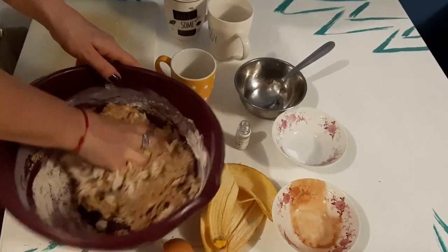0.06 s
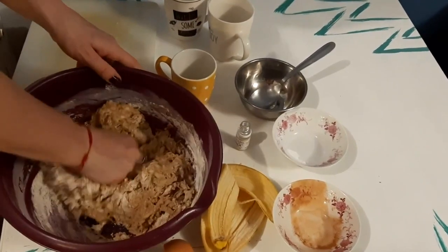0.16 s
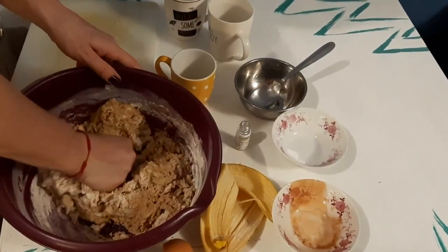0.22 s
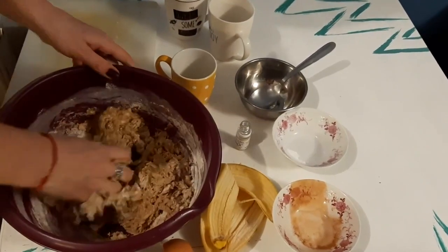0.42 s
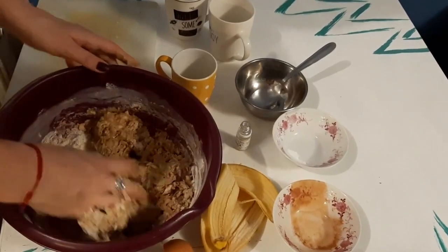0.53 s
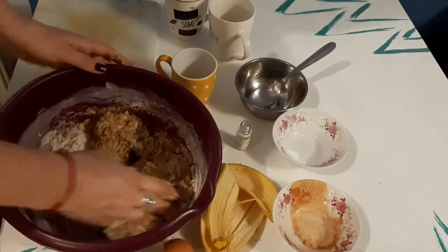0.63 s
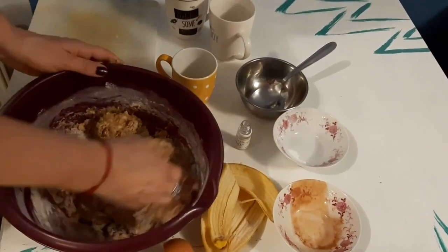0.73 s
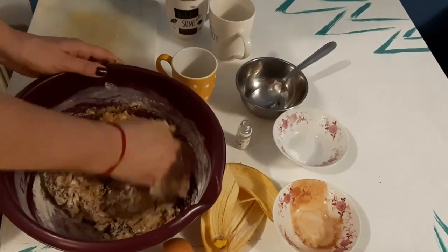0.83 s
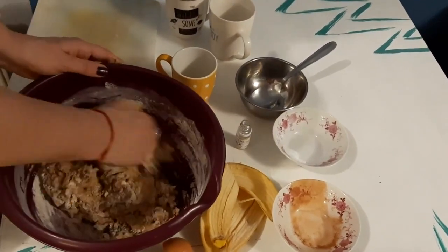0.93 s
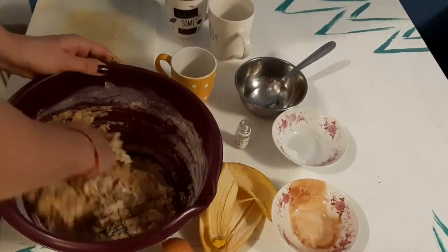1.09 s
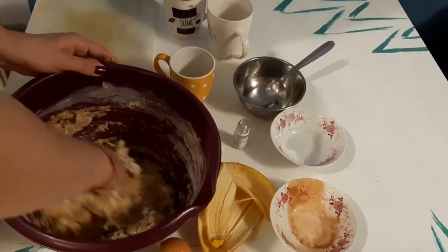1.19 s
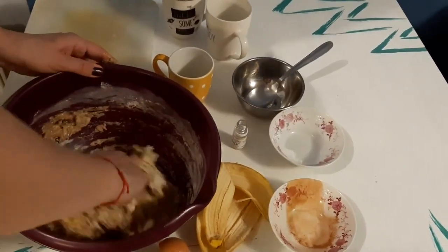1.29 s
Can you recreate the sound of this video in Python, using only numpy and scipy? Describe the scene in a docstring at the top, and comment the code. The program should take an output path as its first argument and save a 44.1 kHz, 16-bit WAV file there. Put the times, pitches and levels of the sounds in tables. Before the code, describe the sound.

Soft, sticky dough squishes throughout as a hand kneads it in a plastic bowl, close and slightly right, with fine wet crackle, small air pops and a dull rumble under each push. At about 0.2 seconds the bowl knocks sharply on the table and skids briefly. Pops cluster around 0.5 seconds, and a rubbing swell comes near 1.15 seconds as the dough is dragged round. The small kitchen is quiet.

```python
"""Soft, sticky dough kneaded by hand in a plastic bowl, close to a stereo pair on a kitchen table.
Slightly right of centre, the dough squishes with a fine wet crackle and air pockets pop in it,
while the bowl rumbles under the pushes. Once the bowl tips, knocks on the table and skids a little.
Behind it the small room answers, over quiet room tone."""
import sys
import numpy as np
from scipy import signal
from scipy.fft import rfft, irfft
from scipy.io import wavfile

SR = 44100
rng = np.random.default_rng(int(sys.argv[2]) if len(sys.argv) > 2 else 0)


def materialize(psi):
    """Save the field psi as 16-bit PCM at rate SR to the path in sys.argv[1].

    A 1-D psi becomes a single channel; in a 2-D psi each row is a channel.
    """
    bounded = np.clip(np.atleast_2d(psi).T, -1, 1)
    quanta = np.round(bounded * 32767).astype(np.int16)
    wavfile.write(sys.argv[1], SR, quanta)


N = 59535
T = np.arange(N) / SR
BIN_HZ = np.arange(N // 2 + 1) * SR / N


def from_db(db):
    """Decibels to gain."""
    return 10 ** (np.asarray(db) / 20)


def unit_rms(x):
    """Scale to unit power."""
    return x / np.sqrt(np.mean(x ** 2) + 1e-20)


def at_hz(points, hz):
    """Read a table on a log-frequency axis."""
    f, value = np.transpose(points)
    return np.interp(np.log(hz + 1e-3), np.log(f), value)


def pan(db):
    """Gains at the two microphones; positive dB is to the left."""
    return from_db(np.array([[.5], [-.5]]) * db)


def butter(x, order, hz, kind="low"):
    """Butterworth filter."""
    return signal.sosfilt(signal.butter(order, hz, kind, fs=SR, output="sos"), x + 1e-18)


def band(x, hz, width_hz):
    """A band-pass with fairly steep skirts."""
    low = np.sqrt(hz ** 2 + width_hz ** 2 / 4) - width_hz / 2
    return butter(x, 2, [low, min(low + width_hz, .45 * SR)], "band")


def colour(x, spectrum):
    """Give a signal a spectrum; unit power."""
    return unit_rms(irfft(rfft(x) * from_db(at_hz(spectrum, BIN_HZ)), N))


def burst(s, decay_s):
    """Sudden start, exponential decay."""
    return (T >= s) * np.exp(-np.abs(T - s) / decay_s)


def swell(s, rise_s, fall_s):
    """Exponential rise to a peak and fall from it."""
    return np.exp(-np.abs(T - s) / np.where(T < s, rise_s, fall_s))


# likeness of diffuse sound at the two microphones: f/Hz, correlation
MIC_LIKENESS = [(100, 0.93), (260, 0.96), (520, 0.76), (1100, 0.053), (3000, 0.023), (12000, 0.02)]
def noise(spectrum):
    """Coloured stereo noise, alike at both microphones in the bass only."""
    mid, side = rfft(rng.standard_normal((2, N)))
    alike = at_hz(MIC_LIKENESS, BIN_HZ)
    pair = np.sqrt(1 + alike) * mid + np.sqrt(1 - alike) * side * [[1], [-1]]
    return unit_rms(irfft(pair * from_db(at_hz(spectrum, BIN_HZ)), N))


# spectrum of the quiet kitchen: f/Hz, relative level/dB
ROOM_TONE_SPECTRUM = [(25, -27), (60, 1), (140, 9.5), (400, 11), (1000, -45), (2200, -19), (15000, -27)]
def room_tone():
    """A faint, low, steady noise all round the microphones."""
    return from_db(-65.5) * noise(ROOM_TONE_SPECTRUM)


# reverberation of the kitchen: f/Hz, T60/s
ROOM_DECAY = [(120, 0.76), (700, 0.43), (2000, 0.33), (5000, 0.34), (13000, 0.25)]
def kitchen_echo(delay_s=0.0019):
    """The walls' answer: bands of noise, each dying at its own rate; unit energy."""
    white, echo = noise([(20, 0), (20000, 0)]), 0
    edges_hz = np.geomspace(60, 18000, 9)
    for low, high in zip(edges_hz, edges_hz[1:]):
        t60 = at_hz(ROOM_DECAY, np.sqrt(low * high))
        echo = echo + butter(white, 2, [low, high], "band") * from_db(-60 * T / t60)
    return unit_rms(echo * (T > delay_s)) / np.sqrt(N)


def in_room(x, echo, wet_db):
    """Direct sound at the microphones plus its echo."""
    x = x * np.ones((2, 1))
    return x + from_db(wet_db) * signal.fftconvolve(x, echo, axes=1)[:, :N]


# soft shoves on the table: t/s, level/dB
TABLE_SHOVES = [(0.17, -51), (0.355, -51), (.645, -60), (1.084, -52.5)]
def table_sway(hz=91.8, rise_s=0.04):
    """Each shove rocks the table: a low tone swells and fades."""
    sway = 0
    for s, db in TABLE_SHOVES:
        age = np.maximum(T - s, 0)
        envelope = (age / rise_s * np.exp(1 - age / rise_s)) ** 2
        sway = sway + from_db(db) * envelope * np.sin(2 * np.pi * hz * age)
    return sway


# modes of bowl and table: f/Hz, relative level/dB, T60/s
BOWL_TABLE_MODES = [(133.9, 5.5, 0.29), (158.7, 3, 0.2), (183, -0.5, 0.092), (230.2, 4, 0.22),
                    (303, 6.5, 0.2), (343.2, 3.5, 0.26), (442, -9.5, 0.45), (488.5, -6.5, 0.39),
                    (566.2, -12.5, 0.27), (612, 0, 0.13), (812, -9, 0.063)]
def bowl_rings(force):
    """The bowl and table answer a force with a decaying sine for each mode."""
    ringing = 0
    for hz, db, t60 in BOWL_TABLE_MODES:
        radius, angle = from_db(-60 / (t60 * SR)), 2 * np.pi * hz / SR
        feedback = [1, -2 * radius * np.cos(angle), radius ** 2]
        ringing = ringing + from_db(db) * signal.lfilter([0, np.sin(angle)], feedback, force + 1e-18)
    return ringing


# the hand presses the dough against the bowl: t/s, level/dB, rise/s, fall/s
HAND_PUSHES = [(0.071, -54.5, 0.013, 0.027), (0.177, -47, 0.0034, 0.0088), (0.456, -46.5, 0.0048, 0.031),
               (0.54, -54, 0.0054, 0.068), (0.665, -48.5, 0.0066, 0.047), (0.828, -47.5, 0.013, 0.028),
               (1.0, -52.5, 0.02, 0.014), (1.197, -54, 0.0058, 0.019)]
# spectrum of the bowl's rumble: f/Hz, relative level/dB
RUMBLE_SPECTRUM = [(40, -29), (90, -12.5), (140, 3.5), (220, 1), (350, -4.5), (600, -7), (1000, -18),
                   (2500, -54)]
def bowl_rumble(drag_db=-29.5, drag_follows=0.62, ring_db=-6):
    """Dull rumble and faint ring of the bowl under each push and the dragged dough."""
    squeeze_db, _ = squeeze()
    drag = from_db(drag_db + drag_follows * squeeze_db)
    push_power = sum((from_db(db) * swell(s, rise, fall)) ** 2 for s, db, rise, fall in HAND_PUSHES)
    effort = np.sqrt(drag ** 2 + push_power)
    rumble = effort * noise(RUMBLE_SPECTRUM)
    ringing = unit_rms(bowl_rings(effort * rng.standard_normal(N)))
    return rumble + from_db(ring_db) * np.std(rumble) * ringing


# hiss of plastic sliding on the table: f/Hz, relative level/dB
SKID_SPECTRUM = [(300, -18), (1200, -8), (2300, 10.5), (3200, -7), (5000, 6), (9000, -5.5), (12000, -2.5),
                 (15000, -14)]
# squeaks in the slide: f/Hz, width/Hz, level/dB
SKID_SQUEAKS = [(2280, 92, -32), (8210, 140, -34.5), (11670, 790, -34.5)]
def bowl_skid(echo):
    """The bowl slides briefly after landing: a hiss with thin squeaks in it."""
    rub = from_db(-29) * noise(SKID_SPECTRUM)
    for hz, width_hz, db in SKID_SQUEAKS:
        rub = rub + from_db(db) * unit_rms(band(rng.standard_normal((2, N)), hz, width_hz))
    return in_room(rub * swell(0.2464, rise_s=0.0045, fall_s=0.0083), echo, wet_db=-10)


# the bowl lands and rocks: t/s, thump level/dB, crack level/dB
BOWL_CONTACTS = [(0.2256, -27.5, -18.5), (0.233, -26, -28.5), (.2470, -31, -35.5)]
# the bowl's higher modes, too close to tell apart: f/Hz, relative level/dB
BODY_SPECTRUM = [(30, -42), (70, -46), (110, -25), (250, 6.5), (420, 4), (640, 4.5), (880, -0.5),
                 (1100, -4.5), (1600, -15), (3500, -24)]
# crack of the plastic: f/Hz, relative level/dB
CRACK_SPECTRUM = [(40, -27), (110, -8), (650, 9.5), (1150, -2.5), (2200, -2), (3000, -6), (4600, -2),
                  (6000, -15.5), (9000, -16), (15000, -46)]
def bowl_knock(echo, contact_hz=1070, low_cut_hz=151.5, body_t60_s=0.31):
    """Each contact rings the bowl and table and gives a short plastic crack."""
    blows, cracks = np.zeros(N), 0
    for s, thump_db, crack_db in BOWL_CONTACTS:
        blows[int(s * SR)] -= from_db(thump_db)
        cracks = cracks + from_db(crack_db) * burst(s, decay_s=0.0066)
    force = butter(butter(blows, 1, contact_hz), 4, low_cut_hz, "high")
    thump = in_room(bowl_rings(force), echo, wet_db=-14.5)
    landing_s = BOWL_CONTACTS[0][0]
    body = from_db(-24) * burst(landing_s, body_t60_s / np.log(1000)) * noise(BODY_SPECTRUM)
    return thump + body + in_room(cracks * noise(CRACK_SPECTRUM), echo, wet_db=-1.5)


# where the bowl sits between the microphones: f/Hz, left minus right/dB
BOWL_POSITION = [(150, -2.5), (600, -3.5), (1300, -1.3), (4500, -3.5), (11000, -0.5)]
def place_bowl(bowl):
    """The bowl is a little louder on the right, by an amount that varies with frequency."""
    return irfft(rfft(bowl) * pan(at_hz(BOWL_POSITION, BIN_HZ)), N)


def dough_sweep(echo, peak_s=1.153, width_s=0.073):
    """A smooth swell of rubbing as the lump is dragged round the bowl's wall."""
    rub = unit_rms(band(rng.standard_normal((2, N)), hz=2830, width_hz=2400))
    envelope = np.exp(-((T - peak_s) / width_s) ** 2)
    return in_room(from_db(-47) * envelope * rub, echo, wet_db=-5)


# air pockets and sticky strands burst: t/s, level/dB, f/Hz, width/Hz, decay/s, left minus right/dB
DOUGH_POPS = [(0.0635, -39, 1900, 1350, 0.0036, -1), (0.1084, -41, 3420, 1490, 0.0015, -14),
              (0.173, -26, 1900, 2160, 0.0011, 7.5), (0.181, -35, 1880, 1500, 0.0011, -18),
              (.3200, -35.5, 8950, 9050, 0.0013, -4), (0.4334, -38.5, 11200, 11400, 0.00084, 10),
              (0.4464, -40.5, 1570, 3040, 0.003, -1), (0.4588, -36, 3640, 1580, 0.0031, -12),
              (0.492, -40.5, 10100, 8500, 0.0035, -7), (0.5185, -27, 4440, 1930, 0.0016, -9.5),
              (0.5180, -34, 9900, 7000, 0.0013, -11), (0.5269, -43, 870, 720, 0.01, -1),
              (0.5616, -41, 8550, 5000, 0.0017, 2), (0.5893, -40.5, 9600, 5000, 0.001, -4),
              (0.7072, -47.5, 2110, 450, 0.0084, -6), (0.9066, -32, 2460, 1700, 0.0015, 6.5),
              (0.9095, -41.5, 2280, 890, 0.013, 2), (0.988, -45.5, 1940, 1700, 0.0079, 3),
              (1.0326, -42, 3940, 4000, 0.002, -7), (1.043, -40, 6460, 9180, 0.0015, -6),
              (1.1106, -45, 3540, 2800, 0.0015, -6)]
def dough_pops(echo, right_lag_s=0.00013, wet_db=-5.5):
    """Each burst is a snap of noise in its little cavity's resonance; the room answers in that band."""
    direct, to_room = 0, 0
    for s, db, hz, width_hz, decay_s, pan_db in DOUGH_POPS:
        envelope = burst(s, decay_s)
        size = from_db(db) * pan(pan_db) * np.sqrt(np.mean(envelope ** 2))
        left = unit_rms(band(rng.standard_normal(N) * envelope, hz, width_hz))
        right = np.interp(T - right_lag_s, T, left)
        direct = direct + size * np.array([left, right])
        click = signal.unit_impulse(N, int(s * SR))
        to_room = to_room + size * unit_rms(band(click, hz, width_hz))
    return direct + from_db(wet_db) * signal.fftconvolve(to_room, echo, axes=1)[:, :N]


def dough_crackle(band_snaps_per_s=450, spread_db=1.4):
    """Tiny wet snaps at random moments, in eight pitch regions."""
    crackle = 0
    for hz in np.geomspace(700, 13000, 8):
        size_db = spread_db * np.minimum(rng.exponential(1, N), 4)
        sizes = from_db(size_db) * rng.standard_normal((2, N))
        snapping = rng.random(N) < band_snaps_per_s / SR
        crackle = crackle + band(sizes * snapping, hz, width_hz=hz * .42)
    return crackle


# how hard the dough is squeezed and torn: t/s, level/dB, treble lift/dB
HAND_SQUEEZE = [(0, -66.5, 9.5), (.055, -53, 0), (.13, -48.5, -3), (.19, -49, -3), (.215, -46.5, -4),
                (.32, -47.5, -6), (0.427, -61.5, 7.5), (0.451, -44, 2), (.48, -49, -7.5), (.50, -54, 10),
                (0.56, -57, 10), (0.59, -61, 3), (.603, -65, 2.5), (.69, -65, 10), (.748, -57.5, -10),
                (0.763, -55.5, 1), (.83, -51, -4), (.89, -50.5, -7), (.99, -50, 4), (1.069, -53, 5),
                (1.15, -47, 4.5), (1.22, -49, -1), (1.30, -52.5, 0), (1.35, -61, 4)]
def squeeze():
    """The working hand's course: level and treble lift in dB at every sample."""
    s, level_db, treble_db = np.transpose(HAND_SQUEEZE)
    return np.interp(T, s, level_db), np.interp(T, s, treble_db)


# spectrum of wet dough at close range: f/Hz, relative level/dB
DOUGH_SPECTRUM = [(200, -32), (600, -9), (1100, -6), (1600, -2), (2200, 2), (2900, -6), (4300, -1.5),
                  (6000, -7.5), (9500, -11.5), (12000, -12.5), (15500, -19.5)]
def dough_squish(echo, snap_share=0.28, flicker_db=0.5, flicker_hz=43.7, treble_hz=6060):
    """Countless wet snaps over the smooth rub of skin on dough; the level flickers slightly."""
    level_db, treble_db = squeeze()
    flicker = unit_rms(band(rng.standard_normal(N), flicker_hz, flicker_hz * 2))
    snaps = np.sqrt(snap_share) * colour(dough_crackle(), DOUGH_SPECTRUM)
    rub = np.sqrt(1 - snap_share) * noise(DOUGH_SPECTRUM)
    dull = butter(snaps + rub, 1, treble_hz)
    treble = snaps + rub - dull
    squish = from_db(level_db + flicker_db * flicker) * (dull + from_db(treble_db) * treble)
    return in_room(squish, echo, wet_db=-5)


def scene():
    """Bowl and dough, close and slightly to the right, over quiet room tone."""
    echo = kitchen_echo()
    bowl = place_bowl(bowl_knock(echo) + bowl_skid(echo) + bowl_rumble() + table_sway())
    dough = pan(-2) * (dough_squish(echo) + dough_sweep(echo))
    return bowl + dough + dough_pops(echo) + room_tone()


def record(dry, cutoff_hz=15900):
    """The top of both channels is cut steeply."""
    return signal.sosfilt(signal.ellip(10, .1, 80, cutoff_hz, fs=SR, output="sos"), dry)


dry = scene()
out = record(dry)
materialize(out)
```